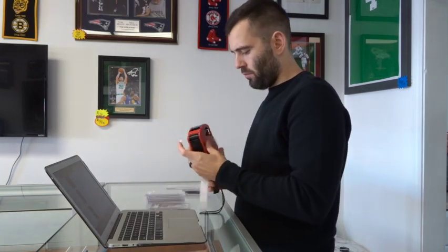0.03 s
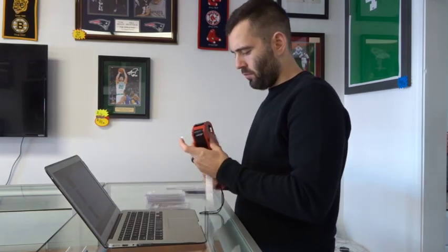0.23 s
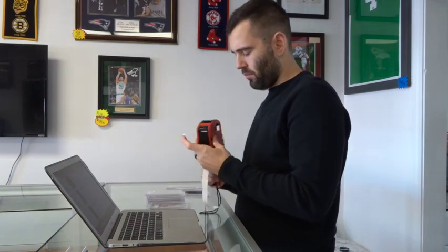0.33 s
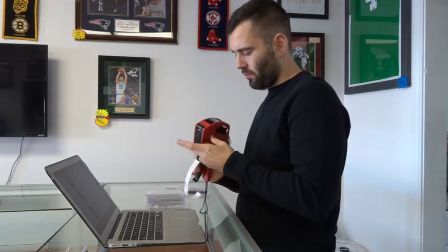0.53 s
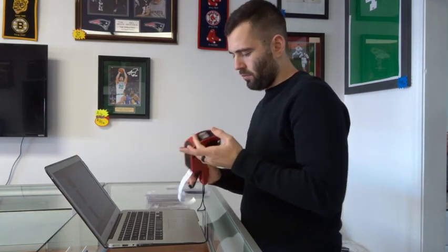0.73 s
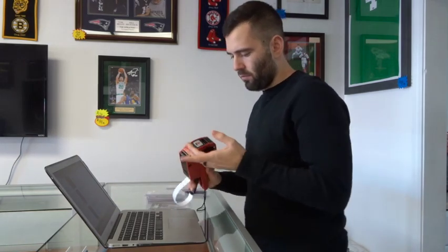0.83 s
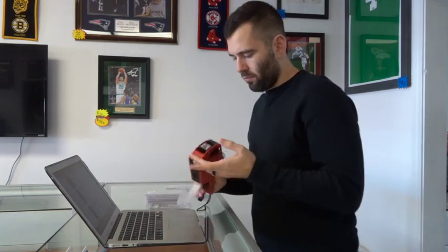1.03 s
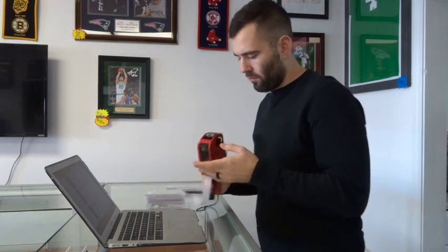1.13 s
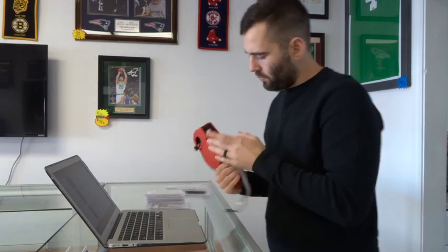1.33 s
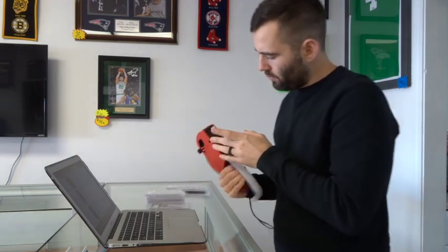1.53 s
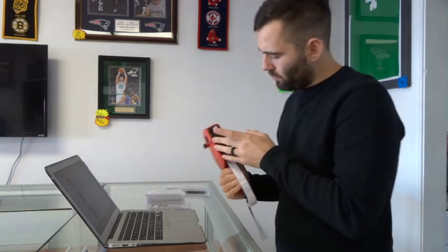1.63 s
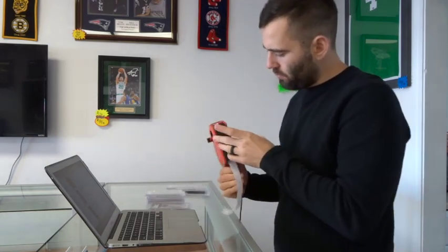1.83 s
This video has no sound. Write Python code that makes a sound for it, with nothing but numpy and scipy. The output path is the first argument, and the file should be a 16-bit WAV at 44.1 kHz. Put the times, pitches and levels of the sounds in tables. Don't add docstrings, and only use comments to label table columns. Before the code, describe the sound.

A handheld plastic label gun gives two loud, rattly clacks in quick succession, then a bright latch snap, followed by soft handling ticks and a dull palm knock, close up in a bare, lively room with low ventilation hum.

```python
import sys
import numpy as np
from scipy import signal
from scipy.io import wavfile

SR = 44100
rng = np.random.default_rng(int(sys.argv[2]) if len(sys.argv) > 2 else 0)


def unload_audio(sound):
    columns = np.transpose(np.atleast_2d(sound))
    steps = np.round(np.clip(columns, -1, 1) * 32767)
    wavfile.write(sys.argv[1], SR, steps.astype(np.int16))


def how_loud(loudness_db):
    steps = np.asarray(loudness_db, float) / 20
    return 10 ** steps


N = 83790

# pitch_hz, level_db (per Hz)
AIR_SPECTRUM = [(12, -36), (20, -6), (211, -8), (685, -20.5), (895, -21), (1140, -21), (3800, -37.5),
                (9690, -46.5), (12000, -54), (15600, -92), (22000, -120)]
# pitch_hz, likeness_0_to_1
AIR_LIKENESS = [(60, 1), (250, 0.98), (1000, 0.52), (2500, 0), (4500, 0), (10000, 0)]
# pitch_hz, width_hz, level_db
DUCT_TONES = [(200.6, 22.3, -58.5), (241, 15.8, -59.5), (162.6, 8.3, -67)]
# time_s, gain_db
AIR_GAIN = [(0, 1), (.24, 2.5), (.3, 1), (.7, 1.5), (.95, 3.5), (1.9, 2.5)]
# start_s, level_db, pitch_hz, hollow_share_db, crack_share_db
TICKS = [(0.0024, -26.5, 2650, -3, -13), (0.0085, -35.5, 2742, -12, -20), (0.16, -38.5, 2600, -5, -24),
         (0.9252, -27.5, 1840, 0, -18), (1.0684, -32, 575, -11, -20), (1.0784, -48, 564, -18, -44),
         (1.0900, -38, 2100, -8, -22), (1.0984, -40, 1050, -12, -20), (1.1044, -41, 2180, -10, -18),
         (1.14, -53, 764, -19, -9), (1.2725, -35.5, 3350, -13, -11), (1.2760, -30.5, 2270, -20, -25),
         (1.2815, -31.5, 2680, -1.5, -23), (1.2936, -37, 1800, -4, -18), (1.3264, -37.5, 2340, -10, -18),
         (1.3325, -38, 1750, 0, -15), (1.3922, -34, 2360, -30, -32), (1.3990, -36.5, 2693, -15, -18),
         (1.4050, -38, 1780, -5, -25), (1.4727, -45, 2600, -25.5, -25.5), (1.481, -44.5, 1760, -27.5, -25),
         (1.5194, -52, 797, -9.5, -24), (1.8135, -71, 953, -1, -23), (1.8592, -43, 554, -21, -34)]
# start_s, level_db, hollow_share_db, crack_share_db, pitch_hz
CLACKS = [(0.2092, -40, -23.5, -8, 2780), (0.211, -27, -13, -11, 2800), (0.2174, -49, -12, -14, 1800),
          (0.2283, -23, -23, -3.5, 2350), (0.2300, -15, -29, -11.5, 2350), (0.2353, -19, -3, -8, 2700),
          (0.2405, -12.5, -23, -5.5, 2350), (0.2430, -11, -18.5, -5.5, 2300), (0.2499, -6, 1, -10, 2366),
          (0.2556, -16, 6.5, -6, 1700), (0.2600, -16, 5.5, 1.5, 3500), (0.2665, -20, -1.5, 1.5, 2400),
          (0.2735, -20, 3, -10.5, 1700), (0.2834, -12.5, 5, -8, 3000), (0.2884, -15, 7, -4, 2400),
          (0.3013, -13.5, 3.5, -9.5, 1700), (0.3126, -21, -10.5, -10.5, 3000), (0.3743, -14, -22, -6, 2500),
          (0.3820, -26.5, -22, -17.5, 3700), (0.4075, -25, -14.5, -4.5, 1700), (0.4100, -21, -12, -5, 1800),
          (0.4126, -18, 11.5, -7, 2200), (0.4170, -7, -7, -6, 2600), (0.4214, -7.5, 3, -13.5, 1800),
          (0.4271, -3.5, -2.5, -1.5, 3400), (0.4315, -8, -9, 0.5, 2300), (0.4365, -15.5, -1, 2.5, 1900),
          (0.4451, -14.5, 1.5, -11.5, 3500), (0.4520, -15.5, -1, -3, 4000), (0.4597, -13.5, -6, -1, 3000),
          (0.4740, -23.5, 4.5, -14, 1700), (0.482, -24.5, -1, -12, 1700), (0.6194, -28.5, -28, -30, 2400),
          (0.6253, -29, -4, -2.5, 2400)]
# time_s, level_db
RATTLE_LEVEL = [(.02, -58.5), (.2, -68), (.228, -37.5), (.25, -24.5), (.3, -31.5), (.404, -44),
                (.425, -21.5), (.48, -33.5), (.56, -45), (.63, -47.5), (.68, -75), (.72, -41.5), (.8, -52),
                (1.05, -68.5), (1.12, -56.5), (1.25, -64.5), (1.34, -63), (1.6, -70)]
# pitch_hz, level_db, t60_s
HOLLOW_MODES = [(692, -17, 0.051), (783, -8, 0.04), (833, -2, 0.025), (846, -4.5, 0.043), (922, -4, .03),
                (959, 1, 0.053), (991, -7, 0.024), (1010, -2.5, 0.046), (996, -14, 0.0086)]
# pitch_hz, level_db, t60_s
SHELL_MODES = [(1612, -5, 0.022), (1719, -5, 0.015), (1832, -9, 0.022), (2114, -6, 0.011),
               (2340, -2.5, 0.012), (2765, -5.5, 0.011), (3075, -5, 0.0084), (3444, -11, 0.0055),
               (3840, -3.5, 0.0053)]
# pitch_hz, level_db, t60_s
SMALL_PART_MODES = [(4330, 1, 0.006), (4780, -0.5, 0.0054), (5740, -6.5, 0.0047), (6660, -0.5, 0.004),
                    (8030, -9.5, 0.002)]
# pitch_hz, t60_s
ROOM_T60 = [(200, 0.87), (500, 0.27), (1000, 0.33), (2000, 0.26), (4000, 0.39), (9000, 0.27)]
# pitch_hz, level_db
ROOM_TONE = [(200, 7), (1000, -0.04), (3000, -2.7), (10000, 5.5)]
# pitch_hz, likeness_0_to_1
ROOM_LIKENESS = [(250, 0.99), (1000, 0.81), (2500, 0.72), (4500, 0), (10000, 0)]
# start_s, level_db, crack_share_db, pitch_hz
LATCH_SNAPS = [(.6870, -13, -12, 2470), (.6884, -11, -11.5, 3530), (.6896, -11.5, -10.5, 3620),
               (.6950, -16, -14, 3330), (.6990, -22, -11, 3340), (.7030, -21, -12, 2970),
               (0.7076, -15, -11, 4050), (0.711, -20, -12, 3100), (.7135, -17.5, -9, 2370),
               (.7157, -9, -21, 2610), (0.7179, -8.5, -16, 2363), (0.722, -18.5, -8, 2620),
               (0.7282, -19, -29, 3740), (.7494, -32, -27, 3240)]
# pitch_hz, level_db, t60_s
LATCH_MODES = [(1688, -1.5, 0.021), (2240, -23, 0.022), (2418, 0.5, 0.029), (2880, -7, 0.026),
               (3055, -1, 0.018), (3225, -4, 0.027), (3434, -0.5, 0.023), (3590, -2.5, .012),
               (3970, -3, 0.014), (4290, -3.5, 0.011), (4650, -0.5, 0.0059), (5520, 3, 0.0078),
               (6350, -7, 0.0075)]
# start_s, level_db
COVER_JOLTS = [
    (.6880, -30),
    (0.6972, -25.5),
    (.7140, -22),
    (0.7224, -28.5),
]
# pitch_hz, level_db, t60_s
COVER_MODES = [(1098, -4, .08), (978, -9, 0.049)]
# start_s, level_db
KNOCKS = [
    (1.0685, -32),
    (1.0785, -30.5),
    (1.087, -40),
]
# pitch_hz, level_db, t60_s
KNOCK_MODES = [(250, -5, .015), (346, -7, .018), (450, -9, .012), (560, 2.5, .022), (680, -8, .012),
               (800, -8, .012), (1000, -9, .015), (2120, -4, .01), (2700, -7, .008), (3300, -8, .007)]
# start_s, level_db
SPRING_PLUCKS = [(1.2724, -35), (1.2756, -38), (1.288, -60), (1.304, -54), (1.3308, -50), (1.34, -52),
                 (1.355, -55), (1.3905, -54), (1.3984, -51.5), (1.422, -63), (1.436, -63)]
# pitch_hz, level_db, t60_s
SPRING_MODES = [(4620, -4, .018), (4480, -6, .015), (4260, -6, .014)]


def in_time(rows):
    return np.interp(np.arange(N) / SR, *np.transpose(rows))


def at_hz(points, hz):
    pitch_hz, value = np.transpose(points)
    return np.interp(np.log(hz), np.log(pitch_hz), value)


def band(x, low_hz, high_hz):
    edges_hz = [low_hz, min(high_hz, SR / 2.2)]
    return signal.sosfilt(signal.butter(2, edges_hz, "band", fs=SR, output="sos"), x)


def stereo_bands(likeness):
    edges_hz = 20 * 2 ** np.arange(0, 9.6, .5)
    white = rng.standard_normal((2, 2, N))
    for k, (low_hz, high_hz) in enumerate(zip(edges_hz, edges_hz[1:])):
        mid, side = band(white[k % 2], low_hz, high_hz)
        hz = np.sqrt(low_hz * high_hz)
        alike = np.clip(at_hz(likeness, hz), 0, .999)
        yield hz, np.sqrt(1 + alike) * mid + np.sqrt(1 - alike) * side * [[1], [-1]]


def ventilation():
    knots = np.arange(0, N + 4000, 4000)
    air = 0
    for hz, noise in stereo_bands(AIR_LIKENESS):
        patchy_db = 0.5 * np.interp(np.arange(N), knots, rng.standard_normal(len(knots)))
        air = air + noise * how_loud(at_hz(AIR_SPECTRUM, hz) + patchy_db)
    air = air / air.std() * how_loud(-54)
    for hz, width_hz, level_db in DUCT_TONES:
        tone = band(rng.standard_normal(2 * N), hz - width_hz / 2, hz + width_hz / 2)[N:]
        air = air + tone / tone.std() * how_loud(level_db)
    return air * how_loud(in_time(AIR_GAIN))


def ring(clicks, hz, t60_s):
    r = how_loud(-60 / (t60_s * SR))
    w = 2 * np.pi * hz / SR
    return signal.lfilter([0, np.sin(w)], [1, -2 * r * np.cos(w), r * r], clicks + 1e-18)


def slips(start_s, level_db):
    burst_s, loss_db, first_db, spread_db = .0024, 2.5, -4, 1.5
    order = np.arange(6)
    chance = rng.random((len(start_s), 2, 6))
    at_s = start_s[:, None] + burst_s * (order + chance[:, 0] * (order > 0)) / 6
    uneven_db = spread_db * (2 * chance[:, 1] - 2.5)
    size = how_loud(level_db[:, None] - loss_db * order + first_db * (order == 0) + uneven_db)
    out = np.zeros(N + SR)
    np.add.at(out, (at_s * SR).astype(int), size * (-1) ** order)
    return out[:N]


def rattle():
    hits_per_s = 990
    sizes = how_loud(3.2 * np.minimum(rng.exponential(1, N), 4)) * rng.choice([-1, 1], N)
    return sizes * (rng.random(N) < hits_per_s / SR) * how_loud(in_time(RATTLE_LEVEL))


def struck(modes, start_s, level_db, rattle_db=-200, focus_hz=None):
    focus_db_per_octave, spread_db = 8.5, 2.5
    out = 0
    for hz, mode_db, t60_s in modes:
        away_db = 0 if focus_hz is None else focus_db_per_octave * np.abs(np.log2(hz / focus_hz))
        hit_db = level_db - away_db + spread_db * rng.standard_normal(len(start_s))
        clicks = slips(start_s, hit_db) + how_loud(rattle_db) * rattle()
        out = out + how_loud(mode_db) * ring(clicks, hz, t60_s)
    return out


def tap(start_s, level_db, hz, t60_s):
    click = np.zeros(N)
    click[(np.atleast_1d(start_s) * SR).astype(int)] = how_loud(level_db)
    return ring(click, hz, t60_s)


def pings(start_s, level_db, pitch_hz):
    out = 0
    for at_s, db, hz in zip(start_s, level_db, pitch_hz):
        out = out + band(tap(at_s, db - 5, hz, 34 / hz), hz / 1.158, hz * 1.12)
    return out


def tick_parts():
    out = 0
    for at_s, level_db, hz, *_ in TICKS:
        pair = [(hz, 0, .016), (hz / 1.06, -4, .016)]
        own = struck(pair, np.array([at_s]), level_db - 9)
        out = out + band(own, hz / 1.14, hz * 1.15)
    return out


def dip(x):
    return signal.lfilter(*signal.iirnotch(1295, 7, fs=SR), x)


def gun():
    clacks = np.array(CLACKS)
    contacts = np.vstack([clacks, np.array(TICKS)[:, [0, 1, 3, 4, 2]]])
    start_s, level_db, hollow_db, crack_db, pitch_hz = contacts.T
    hollow = band(struck(HOLLOW_MODES, start_s, level_db + hollow_db - 21.5, -13), 690, 1154)
    shell = struck(SHELL_MODES, start_s, level_db - 9.5, -6.5, np.maximum(pitch_hz, 2100))
    shell = band(shell, 1170, 5000)
    crack = slips(start_s, level_db + crack_db + 0.9) + how_loud(-9) * rattle()
    crack = crack * 4 + struck(SMALL_PART_MODES, start_s, level_db + crack_db - 8, -12)
    crack = band(crack, 3700, 9260)
    thud = band(band(slips(start_s, level_db + hollow_db), 330, 1480), 330, 1480) * how_loud(7.5)
    return hollow + shell + crack + thud + pings(*clacks[:, [0, 1, 4]].T) + tick_parts()


def room(x):
    t = np.arange(N) / SR
    echo = 0
    for hz, noise in stereo_bands(ROOM_LIKENESS):
        echo = echo + noise * how_loud(at_hz(ROOM_TONE, hz) - 60 * t / at_hz(ROOM_T60, hz))
    echo = echo * (1 - np.exp(-(t / 0.0041) ** 2))
    return signal.fftconvolve(echo, x[None], axes=1)[:, :N]


def latch():
    start_s, level_db, crack_db, pitch_hz = np.transpose(LATCH_SNAPS)
    snap = band(struck(LATCH_MODES, start_s, level_db - 12, focus_hz=pitch_hz), 1300, 5800)
    snap = snap + pings(start_s, level_db - 7, pitch_hz)
    jolt_s, jolt_db = np.transpose(COVER_JOLTS)
    cover = sum(tap(jolt_s, jolt_db + mode_db, hz, t60_s) for hz, mode_db, t60_s in COVER_MODES)
    crack = band(slips(start_s, level_db + crack_db + 7), 3700, 9260) * 2
    return dip(snap + band(cover, 900, 1167)), crack


def knock():
    start_s, level_db = np.transpose(KNOCKS)
    return band(struck(KNOCK_MODES, start_s, level_db - 4.5), 210, 4100)


def spring():
    start_s, level_db = np.transpose(SPRING_PLUCKS)
    return band(struck(SPRING_MODES, start_s, level_db), 3850, 6600)


def scene():
    body = dip(gun()) + knock()
    snap, crack = latch()
    air = ventilation()
    body = body + spring()
    pan = how_loud(np.array([[-0.92], [0.92]]))
    near = (body + snap + crack) * pan
    echo = room(body + how_loud(-1.5) * (snap + how_loud(-7.5) * crack))
    return near + how_loud(-33.5) * echo + air


def low_pass(x):
    return signal.sosfilt(signal.butter(12, 12320, fs=SR, output="sos"), x)


def record(dry):
    limit = .8
    rounded = limit * np.tanh(dry / limit)
    treble_cut = signal.cheby2(20, 60, 11520, fs=SR, output="sos")
    return low_pass(signal.sosfilt(treble_cut, rounded))


dry = scene()
out = record(dry)
unload_audio(out)
```